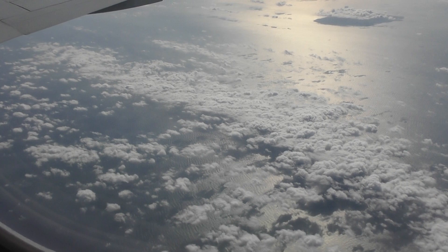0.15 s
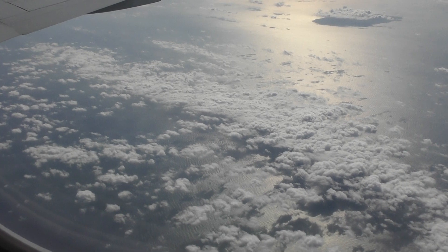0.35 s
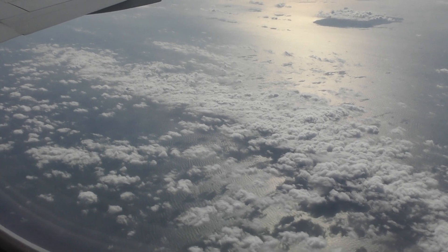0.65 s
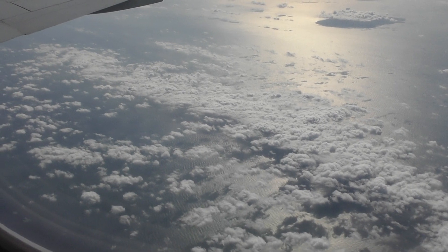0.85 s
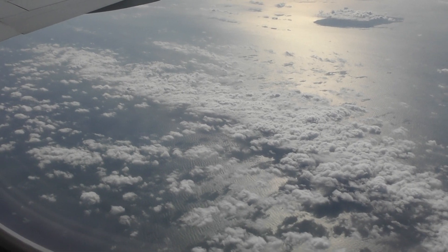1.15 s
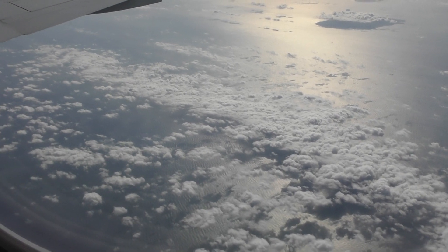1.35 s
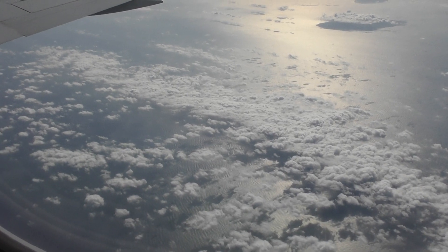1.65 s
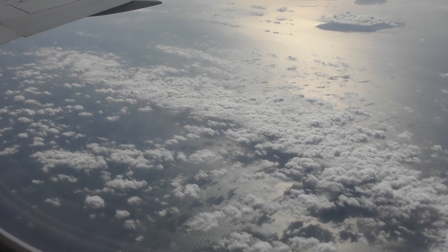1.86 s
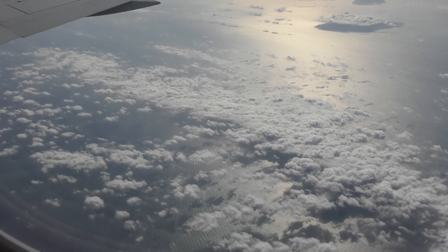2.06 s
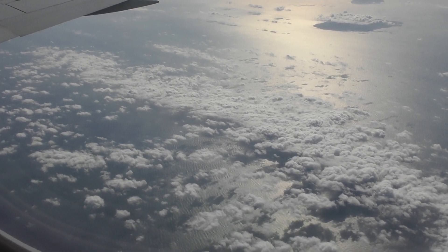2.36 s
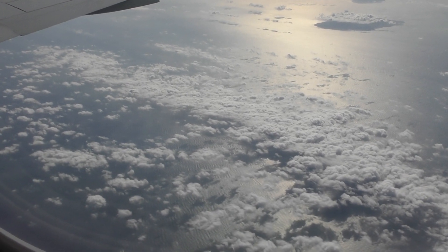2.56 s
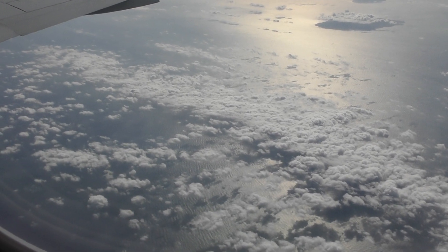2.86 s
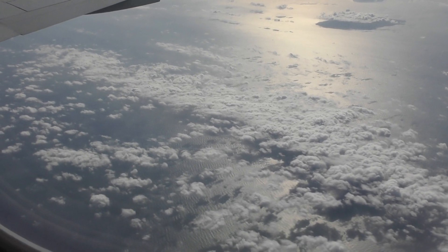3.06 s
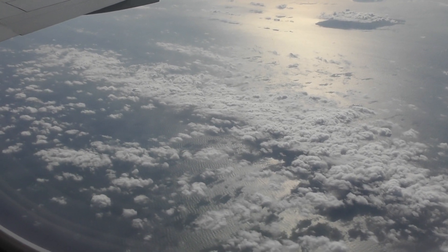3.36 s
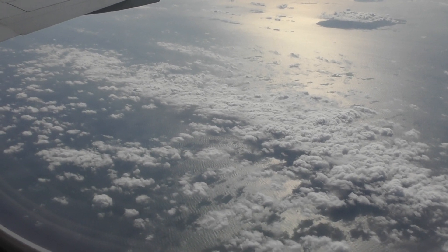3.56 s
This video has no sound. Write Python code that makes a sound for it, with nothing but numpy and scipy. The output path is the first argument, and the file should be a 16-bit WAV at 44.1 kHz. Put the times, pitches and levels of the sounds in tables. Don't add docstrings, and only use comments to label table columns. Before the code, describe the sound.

Steady deep airliner cabin roar with a faint airy vent hiss, filling the whole stretch

```python
import sys
import numpy as np
from scipy import signal
from scipy.fft import rfft, irfft, next_fast_len
from scipy.io import wavfile
from scipy.ndimage import uniform_filter1d, map_coordinates

SR = 44100
rng = np.random.default_rng(int(sys.argv[2]) if len(sys.argv) > 2 else 0)


def to_wav(sig):
    pcm = np.clip(np.atleast_2d(sig), -1, 1) * 32767
    pcm = np.round(pcm).astype(np.int16)
    wavfile.write(sys.argv[1], SR, pcm.T)


def volts_from_db(level):
    exponent = np.asarray(level, float) / 20
    return 10 ** exponent


N = 163170
TIME = np.arange(N) / SR

# (time [s], level [dB])
FLOW = [(0, -14), (.15, -16), (.4, -16.5), (.6, -15), (.95, -16.5), (1.25, -15), (1.6, -15.5), (2.0, -15),
        (2.4, -16), (2.7, -15.5), (3.1, -15), (3.4, -15.5), (3.7, -16.5)]
# (frequency [Hz], density [dB per Hz])
WALL_SPECTRUM = [(54, -31.5), (134, -7.8), (159, -14.5), (287, -18.2), (459, -28.8), (855, -35),
                 (1300, -48), (1800, -63)]
# (frequency [Hz], width [Hz], gain [dB], sign [+1 or -1])
AIR_MODES = [(146, 20, 11, -1), (250, 44, 6.8, 1), (353, 32, 11.6, 1), (489, 72, -1.6, 1),
             (637, 72, -2.6, 1), (805, 37, 3.8, 1)]
# (frequency [Hz], correlation [0-1])
WALL_ALIKE = [(40, .5), (90, .96), (150, .995), (400, .985), (700, .94), (1100, .86), (1500, .45)]
# (frequency [Hz], left over right [dB])
WALL_PAN = [(30, -6), (90, -2), (150, -3.6), (400, -4), (700, -5), (790, -9), (870, -5.5), (1600, -4)]
# (frequency [Hz], left leads by [rad])
WALL_LEAD = [(25, -.1), (50, -.5), (130, -.35), (400, -.3), (700, 0), (800, .35), (1700, .6)]
# (frequency [Hz], density [dB per Hz])
VENT_SPECTRUM = [(880, -27), (1500, -5), (1860, -7.5), (2860, -12.5), (3950, -15), (4950, -19.5),
                 (7840, -19.5), (12100, -26), (15600, -38.5)]
# (frequency [Hz], correlation [0-1])
VENT_ALIKE = [(1500, .45), (4200, .52), (4800, .82), (6200, .8), (8300, .79), (9300, .78), (12500, .66),
              (15500, .3)]
# (frequency [Hz], left leads by [rad])
VENT_LEAD = [(1700, 0.77), (2100, 0), (3300, 0.4), (4500, 0.085)]
# (time [s], length [s], level [dB], centre [Hz], width [octaves])
RUSTLES = [(.13, .06, -72, 5000, 1), (.23, .03, -76, 12500, .25), (.42, .04, -73, 7000, .3),
           (.53, .08, -70, 2500, .6), (.6, .03, -76, 11000, .4), (.925, .04, -72, 7700, .07),
           (1.4, .1, -70, 6200, .3), (1.82, .09, -75, 4600, .03), (2.165, .05, -65, 5000, .5),
           (2.27, .05, -74, 4100, .05), (2.514, .02, -67, 11300, .1), (2.512, .01, -76, 14500, .2),
           (2.64, .02, -69, 6500, .5), (2.642, .03, -76, 10900, .02), (2.72, .12, -68, 3500, .4),
           (2.98, .04, -81, 13000, .3), (3.033, .022, -67, 6500, .3), (3.045, .04, -72, 5500, .025),
           (3.03, .02, -80, 13500, .3), (3.225, .06, -72, 7500, .45), (3.235, .07, -70, 3650, .04),
           (3.38, .07, -75, 4600, .03)]
# (time [s], depth [dB])
DUCKS = [
    (.26, 1.2),
    (.855, 1),
    (1.255, 1.5),
    (1.492, 4.3),
    (2.195, 1.5),
    (3.06, 1.3),
    (3.27, 1.4),
    (3.56, 1.2),
]
# (time [s], pitch [Hz], level [dB])
WHINE_UP = [(2.385, 12600, -92), (2.41, 13150, -79), (2.45, 13400, -76), (2.468, 13950, -79),
            (2.485, 14100, -79), (2.505, 13600, -81), (2.54, 14100, -94), (2.57, 13900, -83),
            (2.595, 14150, -84)]
# (time [s], pitch [Hz], level [dB])
WHINE_DOWN = [(2.65, 13800, -92), (2.662, 13750, -86), (2.675, 14050, -80), (2.69, 13750, -88),
              (2.712, 13600, -80), (2.725, 12900, -83), (2.74, 12600, -84), (2.755, 12500, -82),
              (2.765, 12300, -95)]
# (frequency [Hz], side gain [dB])
SIDE_NULL = [(6150, 0), (6450, -22), (7850, -22), (8050, -4), (9000, 0)]

DUCK_ATTACK_S, DUCK_HOLD_S, DUCK_RELEASE_S = .02, .035, .015


def unit(x):
    return x / np.sqrt(np.mean(x ** 2) + 1e-20)


def along(points, hz):
    f, v = np.transpose(points)
    return np.interp(np.log(hz + 1), np.log(f + 1), v)


def curves(rows):
    s, *columns = np.transpose(rows)
    return [np.interp(TIME, s, column) for column in columns]


def wobble(rate):
    return map_coordinates(rng.standard_normal(400), [TIME * rate])


def filtered(x, response):
    m = next_fast_len(N + SR // 2)
    return irfft(rfft(x, m) * response(np.fft.rfftfreq(m, 1 / SR)), m)[..., :N]


def rush(colour, alike, lead, pan, patchy_db):
    z = signal.stft(rng.standard_normal((2, N)), nperseg=512)[2]
    field = uniform_filter1d(rng.standard_normal(z.shape[1:]), 8, 0)
    field = uniform_filter1d(field, 8, 1)
    pair = signal.istft(z * volts_from_db(patchy_db * unit(field)), nperseg=512)[1][:, :N]

    def mid_side(hz):
        angle = np.arccos(np.clip(along(alike, hz), -1, 1)) / 2
        return colour(hz) * np.array([np.cos(angle), np.sin(angle)])

    def left_right(hz):
        half = volts_from_db(along(pan, hz) / 2) * np.exp(.5j * along(lead, hz))
        return np.array([half, 1 / half])

    mid, side = filtered(pair, mid_side)
    both = filtered(np.array([mid + side, mid - side]), left_right)
    return both / np.sqrt(np.mean(both.mean(0) ** 2))


def roar(flow_db):
    surge_s, surge_per_duck, diffuse_db = .02, .7, -7

    def modes(f):
        response = 1
        for centre, width, db, sign in AIR_MODES:
            resonance = f * width / (centre * centre - f * f + 1j * f * width)
            response = response + np.sign(sign) * volts_from_db(db) * resonance
        return response

    def colour(hz):
        wall = volts_from_db(along([*WALL_SPECTRUM, (6000, -110)], hz))
        return wall * np.hypot(abs(modes(hz)), volts_from_db(diffuse_db))

    surge_db = sum(surge_per_duck * db * np.exp(-.5 * ((TIME - s - DUCK_ATTACK_S) / surge_s) ** 2)
                   for s, db in DUCKS)
    return volts_from_db(flow_db + surge_db) * rush(colour, WALL_ALIKE, WALL_LEAD, WALL_PAN, patchy_db=0.12)


def vents(flow_db):
    vent_db, follows_flow = -59.5, .2
    pan = [(3000, -.4), (9000, 0)]  # (frequency [Hz], left over right [dB])
    level_db = vent_db + follows_flow * (flow_db - flow_db.mean())
    level_db = level_db + 0.92 * wobble(2.2) + 0.3 * wobble(4.7)
    hiss = rush(lambda hz: volts_from_db(along(VENT_SPECTRUM, hz)), VENT_ALIKE, VENT_LEAD, pan, patchy_db=-0.7)
    return volts_from_db(level_db) * hiss


def rustles():
    gain_db, side_share = 3.5, .5
    out = np.zeros((2, N))
    for s, length, db, hz, octaves in RUSTLES:
        mid, side = rng.standard_normal((2, N))
        envelope = np.exp(-(2 * (TIME - s) / length) ** 2)
        noise = (mid + side_share * side * [[1], [-1]]) * envelope
        band = filtered(noise, lambda f: np.exp(-.5 * (np.log2((f + 1) / hz) / octaves) ** 2))
        out += volts_from_db(db + gain_db) * band * np.sqrt(length * SR / 2) / np.linalg.norm(band[0])
    return out


def gain_control(x):
    cut_db = np.zeros(N)
    for s, depth_db in DUCKS:
        since = TIME - s
        attack = np.sin(np.pi / 2 * np.clip(since / DUCK_ATTACK_S, 0, 1)) ** 2
        recovering = np.maximum(since - DUCK_ATTACK_S - DUCK_HOLD_S, 0)
        cut_db += depth_db * attack * np.exp(-recovering / DUCK_RELEASE_S)
    return x * volts_from_db(-cut_db)


def whine():
    out = np.zeros(N)
    for turn in (WHINE_UP, WHINE_DOWN):
        hz, db = curves(turn)
        on = (TIME > turn[0][0]) & (TIME < turn[-1][0])
        level = volts_from_db(db + 5 + 2 * wobble(60))
        phase = 2 * np.pi * np.cumsum(hz + 50 * wobble(90)) / SR
        out += on * level * np.sin(phase)
    return out * volts_from_db([[.6], [-.6]])


def scene():
    flow_db, = curves(FLOW)
    return roar(flow_db) + vents(flow_db) + rustles() + whine()


def band_limit(x):
    return signal.sosfilt(signal.butter(12, 15710, fs=SR, output="sos"), x)


def record(dry):
    mid = dry.mean(0)
    side = filtered((dry[0] - dry[1]) / 2, lambda hz: volts_from_db(along(SIDE_NULL, hz)))
    mix = gain_control(np.array([mid + side, mid - side]))
    return band_limit(mix)


dry = scene()
out = record(dry)
to_wav(out)
```